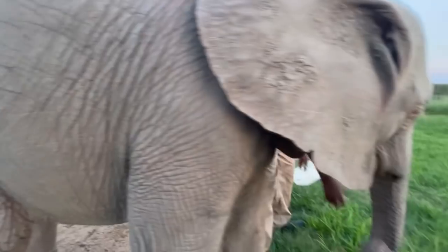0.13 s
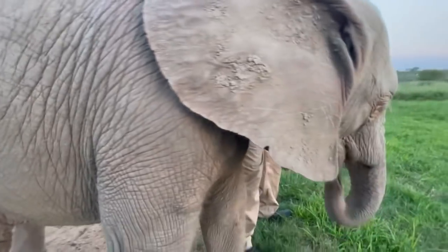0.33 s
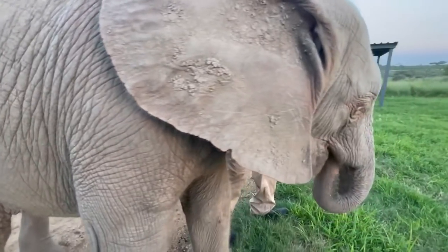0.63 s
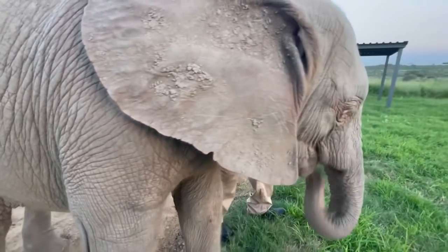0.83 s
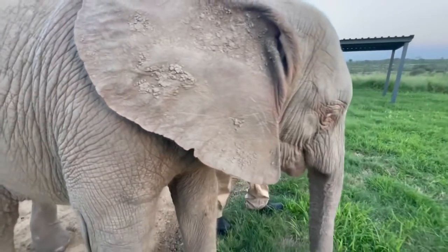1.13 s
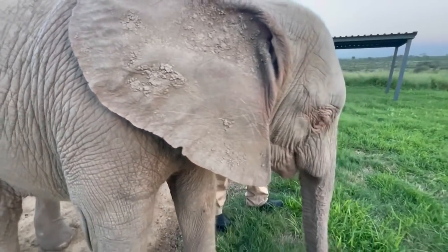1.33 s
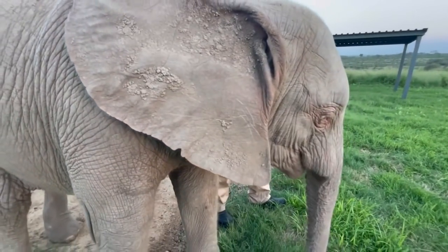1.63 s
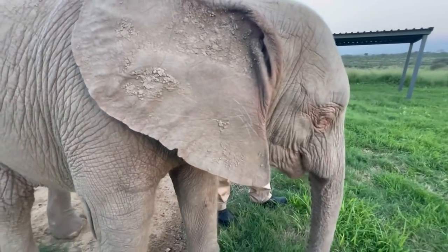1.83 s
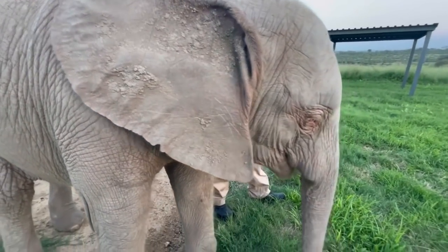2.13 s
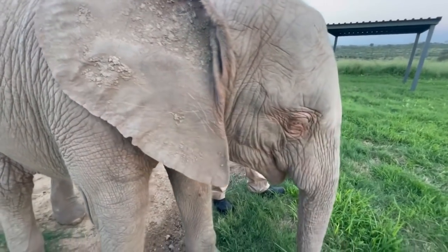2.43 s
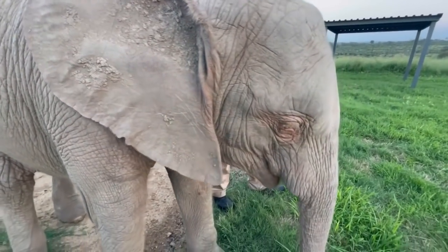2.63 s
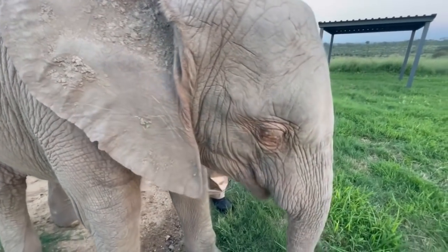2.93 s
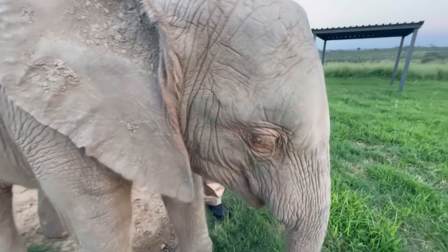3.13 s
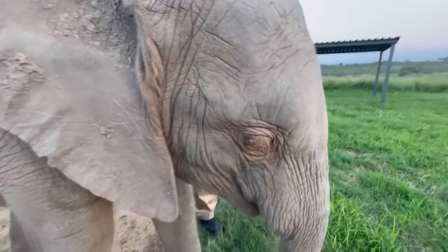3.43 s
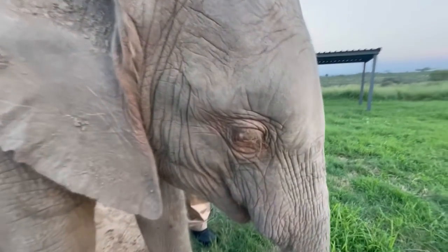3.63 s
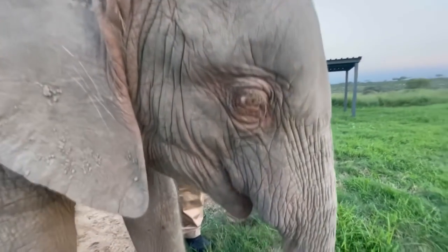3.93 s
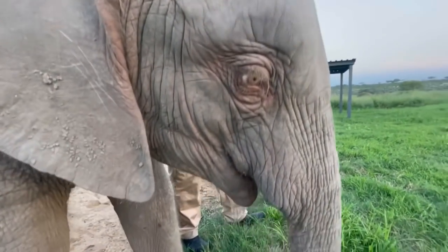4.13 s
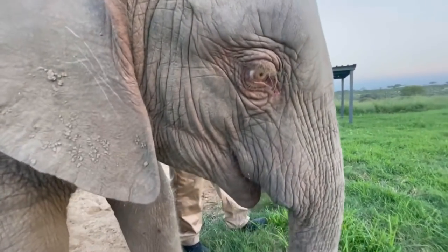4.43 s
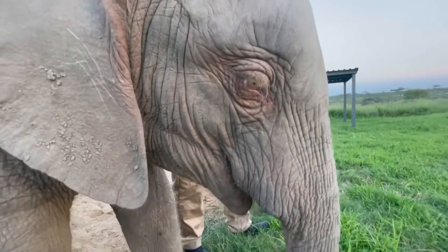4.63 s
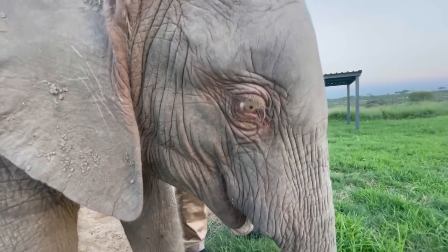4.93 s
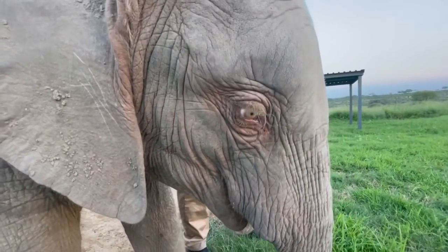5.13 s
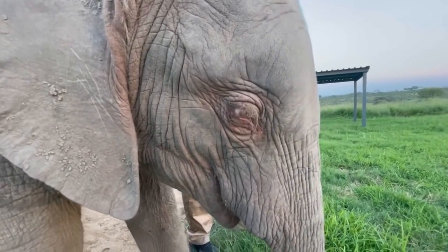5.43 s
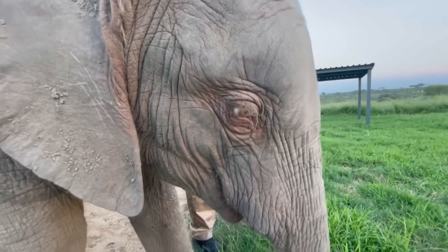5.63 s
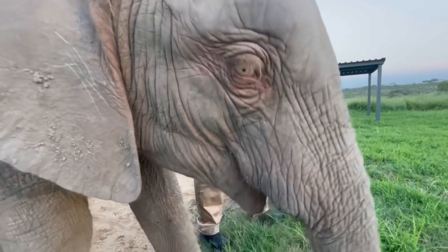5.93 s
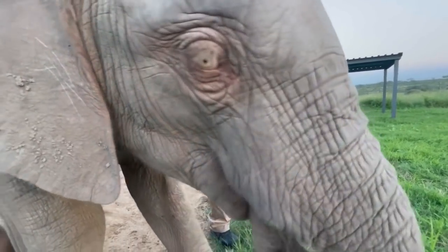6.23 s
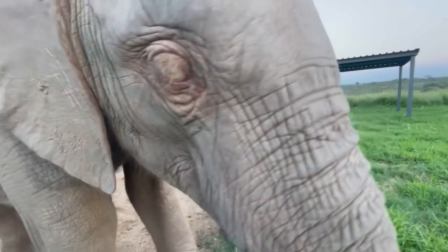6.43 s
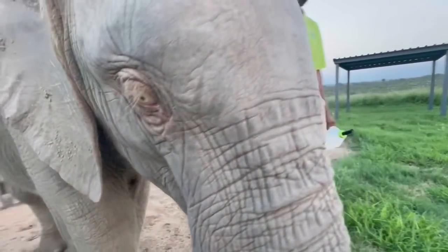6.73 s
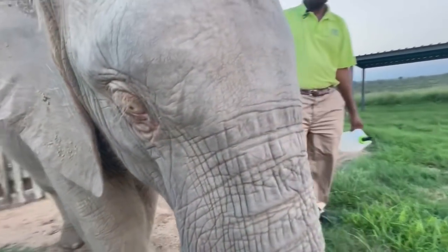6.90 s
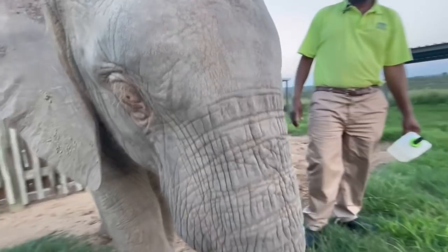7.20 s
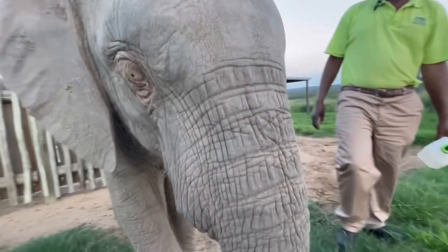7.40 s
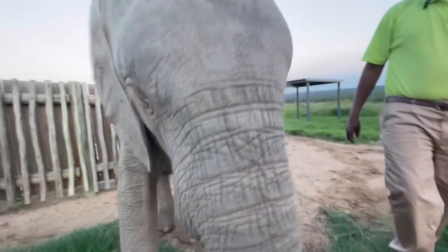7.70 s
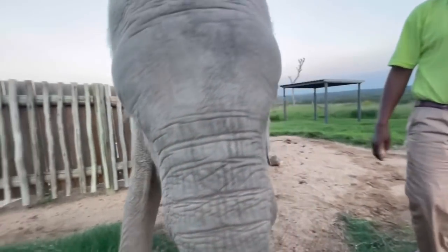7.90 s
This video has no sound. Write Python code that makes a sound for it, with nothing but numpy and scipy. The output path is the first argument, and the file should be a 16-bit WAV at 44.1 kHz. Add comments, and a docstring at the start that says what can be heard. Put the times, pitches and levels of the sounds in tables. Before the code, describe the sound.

A steady, high-pitched drone of crickets and other insects fills an open field throughout, with very faint wind underneath. Close by, a young elephant shifts its weight, making soft scuffs, grass rustle and a couple of light knocks in the first second. A small bird trills faintly at about 1.3 and 2 seconds, and thin pips and dry ticks are scattered until a soft knock near 3.6 seconds. At about 4.7 seconds the grass rustles harder as the animal tugs at it. Stalks snap, sparsely at first and then rapidly, until the tuft rips loose with a crisp crackle and low thumps around 5.6 seconds, by far the loudest moment. From 6.5 seconds there is more shuffling with several soft, hollow knocks. Short chirps return from about 7 seconds, and the insects swell slightly up to the end at 8 seconds.

```python
"""Dusk in a grassy paddock. From the start, crickets and katydids drone on resonant wings over faint wind,
while a large calf close by shifts its feet and ears, with friction noise, soft knocks and dry ticks.
After a second a bird trills twice, and small birds or frogs pip. Near five seconds the calf tugs at
the grass: stalks snap, ever faster, until the tuft tears loose with low thumps at about 5.6 s.
More shuffling, knocks and pips follow, and the insects swell toward the end."""
import sys
import numpy as np
from scipy import signal
from scipy.fft import rfft, irfft, next_fast_len
from scipy.io import wavfile
from scipy.ndimage import map_coordinates

SR = 44100
rng = np.random.default_rng(int(sys.argv[2]) if len(sys.argv) > 2 else 0)


def wav_out(sig):
    """Save sig, one row per channel (or a flat mono array), as 16-bit PCM at SR to the path in sys.argv[1]."""
    wavfile.write(sys.argv[1], SR, np.round(np.clip(np.atleast_2d(sig).T, -1, 1) * 32767).astype(np.int16))


N = 355446
T = np.arange(N) / SR
AGE = T[:SR // 2]   # seconds since the onset of a short event

# Likeness of the two channels, at large and for close snaps. Each row: frequency in Hz, correlation.
LIKENESS = [(60, 0.77), (110, 0.59), (200, 0.62), (380, 0.23), (700, 0.026), (1290, -0.14), (2380, -0.15),
            (4400, -0.03), (8120, -0.59), (15000, -0.16)]
NEAR_LIKENESS = [(60, 0.91), (130, 0.96), (290, 0.87), (640, 0.29), (1410, -0.075), (3100, 0.65),
                 (6820, -0.048), (15000, -0.13)]
# Lean of coloured noise. Each row: frequency in Hz, pan in dB (pan is always left minus right).
BALANCE = [(60, 2), (130, 0.5), (290, 1), (640, 1.5), (1410, 1), (3100, 2.0), (6820, 3), (15000, -5.5)]
# Spectra of the wind and of the crickets' wings. Each row: frequency in Hz, relative level in dB.
WIND_SPECTRUM = [(20, -40), (35, -13), (60, 4), (90, -3), (140, -7), (300, -40)]
CHORUS_SPECTRUM = [(4300, -56), (4650, -41), (5000, -8), (5280, 1.5), (5420, -4.5), (5570, 1), (5720, -5),
                   (5900, -7), (6020, -23), (6400, -44)]
# Wind on the microphone. Each row: time in seconds, level in dB.
GUSTS = [(0.0, -65), (1.0, -64.5), (1.7, -68), (3.6, -65), (3.95, -62.5), (5.4, -64.5), (5.6, -57),
         (5.8, -66), (6.25, -61), (6.45, -74), (6.7, -59), (7.0, -67), (8.06, -60.5)]

# The far insects. Each row: time in seconds, cricket chorus level in dB, upper chorus level in dB.
INSECT_LEVELS = [(0.0, -55, -68), (0.4, -56.5, -66), (0.8, -54.5, -69), (2.3, -52.5, -63.5),
                 (3.4, -55.5, -65), (4.2, -56, -64), (5.1, -55.5, -61.5), (5.7, -54, -57.5),
                 (6.0, -54, -65.5), (6.85, -56.5, -60.5), (7.3, -53.5, -60), (8.06, -54.5, -64)]
# The nearer crickets. Each entry: wing pitch in Hz.
NEAR_WINGS_HZ = [5050, 5130, 5290, 5280, 5380, 5470, 5550, 5640, 5720, 5930]
# Swells of katydids and of low crickets. Each row: middle in seconds, length in seconds, rise in dB.
KATYDID_SWELLS = [(0.5, 0.96, 4.5), (3.2, 4.1, 3.5), (4.29, 0.61, 8.6), (5.07, 0.4, 8.6), (6.4, 0.79, 3),
                  (7.4, 0.68, 6.7), (8.001, 1.2, 8.3)]
LOW_CRICKET_SWELLS = [(0.0, 0.88, 7), (2.13, 0.52, 6), (3.55, 0.5, 6), (5.5, 1.1, 8), (7.25, 1.5, 10.5)]
MEAN_STROKES_PER_S = 45
UPPER_HZ, UPPER_WIDTH_HZ = 8565, 1130
KATYDID_HZ, KATYDID_WIDTH_HZ, KATYDID_PER_S, KATYDID_DB = 15000, 2200, 65, -68
LOW_CRICKET_HZ, LOW_CRICKET_WIDTH_HZ, LOW_CRICKET_PER_S, LOW_CRICKET_DB = 4943, 190, 41.7, -69.5

# The falling notes of a bird's two trills. Each row: start in seconds, level in dB.
TRILL = [(1.261, -61), (1.312, -59), (1.337, -56), (1.374, -56), (1.407, -59), (1.453, -58), (1.488, -55),
         (1.533, -58), (2.0, -58), (2.026, -61), (2.05, -59), (2.077, -60), (2.109, -60), (2.149, -58),
         (2.185, -57), (2.229, -58), (2.265, -58)]
TRILL_NOTE_S, TRILL_FROM_HZ, TRILL_TO_HZ = 0.0162, 5200, 4430
# Single pips. Each row: start and length in seconds, first and last pitch in Hz, level and pan in dB.
PIPS = [(1.285, 0.02, 4300, 3900, -63, 0), (1.6, 0.026, 2900, 2900, -65, 2),
        (2.22, 0.017, 1970, 1970, -64, 0), (2.717, .025, 3190, 3100, -67, 5),
        (1.978, 0.045, 1510, 1490, -65, 8.5), (2.14, 0.039, 1510, 1520, -67, 11),
        (2.28, 0.04, 1490, 1520, -61, 7), (2.438, 0.028, 1525, 1490, -63.5, 8),
        (2.433, 0.033, 3080, 3070, -65, 10), (2.462, 0.026, 2890, 2730, -61, 9),
        (2.865, 0.035, 3010, 3050, -66, 0), (3.28, 0.033, 4250, 3830, -64, 2),
        (3.35, 0.072, 2570, 2475, -58, 7), (3.452, 0.029, 4300, 3830, -61.5, -12),
        (6.87, 0.024, 4470, 3940, -56.5, 0), (6.89, 0.011, 4500, 3900, -57, 0),
        (7.017, 0.0146, 2600, 3000, -58, 0), (7.034, 0.033, 4550, 3800, -57, 2),
        (7.102, 0.021, 3780, 3730, -59, 0), (7.155, .03, 3700, 3600, -59, 0),
        (7.641, 0.065, 3600, 3584, -61.5, 20), (8.014, 0.09, 3600, 3570, -57.5, 14),
        (7.995, 0.058, 3240, 3260, -61, 2)]
# Reflections off ground and shelter. Each row: delay in seconds, gain in dB.
ECHOES = [(.009, -13), (.021, -16), (0.039, -23)]

# Spectra of hide and feet, hollow scuffing, grass and dry leaf tips.
# Each row: frequency in Hz, relative level in dB.
HIDE_SPECTRUM = [(70, -1), (120, 5), (200, 3), (350, -4), (600, -27)]
SCUFF_SPECTRUM = [(300, -2), (480, -1.5), (750, 1.5), (1100, 1.5), (1500, -2.5), (2200, -33)]
GRASS_SPECTRUM = [(1200, -6.5), (1900, 4.5), (2500, 3.5), (4000, 2), (6500, 1.5), (7500, -11.5),
                  (9000, -17.5)]
TIPS_SPECTRUM = [(5500, 5), (6600, 11.5), (7500, 2.5), (8800, 13), (10500, 2.5), (13000, 3.5), (16000, -30)]
# The calf shifts its weight. Each row: middle and length in seconds, rise of hide and of scuff in dB.
SHIFTS = [(0.3, 1.0, 9.9, 13.8), (0.72, 0.63, 14, 13.4), (1.05, 0.54, 7.2, 9.3), (1.9, 0.75, 7.1, 7.5),
          (2.4, 0.44, 8.6, 2.7), (2.95, 0.49, 1.8, 4), (3.75, 1, 1.9, 8.5), (4.3, 0.72, 6.1, 4.7),
          (4.72, 0.79, 16, 14.8), (5.25, 0.51, 13.5, 1.5), (5.62, 0.31, 16, 4.3), (6.1, 1, 9.1, 6.7),
          (6.68, 0.79, 18, 12.4), (7.2, 1, 9.6, 12.5), (7.65, 0.66, 11, 9), (8.06, 0.61, 7.4, 7.5)]
HIDE_DB, SCUFF_DB = -76, -72
# Rustling grass. Each row: time in seconds, grass level in dB, leaf tip level in dB.
RUSTLE_LEVELS = [(0.0, -65, -62), (0.3, -59, -55), (0.5, -58, -60.5), (0.7, -60, -57), (0.95, -66, -80),
                 (1.42, -64, -67.5), (1.7, -62, -66.5), (2.3, -62.5, -64), (2.7, -64, -66.5),
                 (3.4, -62, -65), (4.1, -61.5, -56.5), (4.45, -57, -58.5), (4.68, -58, -68),
                 (4.8, -50.5, -58), (4.95, -55.5, -57), (5.08, -61, -49.5), (5.2, -68, -57),
                 (5.33, -64, -51.5), (5.46, -61.5, -63), (5.62, -56.5, -57), (5.8, -59, -60.5),
                 (5.93, -61, -58), (6.2, -60.5, -63), (6.5, -57.5, -59.5), (6.65, -55, -65),
                 (7.15, -58.5, -62.5), (7.7, -67, -55), (8.06, -67, -56.5)]
PATCH_S, PATCH_OCTAVES, PATCH_DB = .05, .15, 3.0
# Brushing strokes. Each row: start and length in seconds, centre and width in Hz, level and pan in dB.
BRUSHES = [(.001, .45, 135, 50, -64, 0), (.002, .19, 720, 150, -67, -2), (.047, .12, 1190, 100, -67, 5),
           (.09, .2, 1940, 250, -65, -3), (.251, .19, 750, 120, -59, 10), (.482, .09, 1050, 250, -63, -1),
           (.593, .15, 1120, 500, -58, -4), (.678, .12, 950, 700, -63, 0), (2.721, .27, 130, 60, -69, 0),
           (4.126, .14, 12000, 8000, -63, -6), (4.201, .3, 260, 120, -68, 0),
           (4.695, .085, 4400, 6000, -50, 8), (4.701, .07, 13000, 5000, -62, 0),
           (4.703, .07, 2600, 1100, -53, 4), (4.706, .06, 6300, 1500, -54, 5),
           (4.814, .056, 6000, 7000, -55, 4), (5.029, .085, 280, 25, -64, 2),
           (5.035, .13, 4500, 6000, -58, 1), (5.156, .07, 297, 25, -65, -1),
           (5.253, .022, 6500, 7000, -52, -1), (5.376, .014, 8500, 10000, -49, -3),
           (5.636, .2, 6450, 900, -59, 15), (6.493, .12, 770, 500, -58, 5), (6.523, .24, 470, 250, -61, 10),
           (6.541, .19, 725, 70, -62, 4), (6.552, .18, 910, 90, -65, 3), (6.642, .27, 240, 130, -55, 3),
           (6.686, .07, 1650, 120, -65, 3), (6.716, .063, 795, 120, -61, 5),
           (7.184, .05, 7000, 9000, -53, -5), (7.188, .044, 980, 400, -62, -4),
           (7.192, .037, 3240, 300, -56, 4), (7.198, .013, 5000, 7000, -49, 12),
           (7.627, .064, 460, 150, -60, 5)]
# Soft knocks. Each row: start in seconds, peak in dB, body pitch in Hz, t60 in seconds, pan in dB.
KNOCKS = [(0.302, -49, 730, 0.071, 10), (0.614, -44.5, 680, 0.1, 1), (2.42, -55, 450, 0.057, 7),
          (3.615, -43, 820, 0.037, 4), (6.524, -42.5, 890, 0.058, 4), (6.697, -47, 950, 0.061, 17),
          (6.926, -41, 890, 0.096, 4), (7.021, -46, 490, 0.057, 0), (7.199, -47, 990, 0.022, 6),
          (7.631, -46.5, 980, 0.41, -4), (7.765, -49, 1030, 0.067, -2)]
# Dry ticks. Each row: start in seconds, peak in dB, centre in Hz, pan in dB.
TICKS = [(1.13, -60, 900, 2), (1.333, -50, 1890, 4), (1.518, -52, 1460, 5), (1.69, -46.5, 2140, 3),
         (2.05, -51, 1720, 7), (2.118, -55, 300, 14), (2.389, -59, 301, 3), (2.423, -56, 1530, 12),
         (3.372, -57, 780, 11), (3.225, -48, 1910, 6), (3.243, -45.5, 1860, 2.5), (3.483, -54.5, 713, -5),
         (3.715, -49, 1590, 6), (3.225, -46, 11000, 0), (4.16, -39, 14800, 0), (5.098, -48, 13500, 0),
         (5.878, -44, 13500, 0), (5.9, -52, 10000, 0), (5.921, -43, 13000, 0), (5.0375, -39, 12000, -3),
         (5.347, -30, 13000, -3), (6.357, -50, 950, 3.5), (6.856, -48, 1890, 1.5), (7.058, -45, 1900, 0)]

# Thumps as the tuft tears loose. Each row: start in seconds, level in dB, pitch in Hz, t60 in seconds.
THUMPS = [(5.5, -39.5, 200, 0.046), (5.521, -40, 191, 0.08), (5.534, -34.5, 191, 0.045),
          (5.549, -40, 170, 0.08), (5.565, -25, 208, 0.036), (5.585, -20.5, 156, 0.021),
          (5.595, -39, 92, 0.073)]
# Snapping stalks. Each row: start, rise time and t60 in seconds,
# levels of stalk, skin, low ring and high ring in dB, pan in dB.
SNAPS = [(4.929, .00055, 0.04, -48.5, -42, -51, -55, 2), (5.0364, .0003, .02, -48, -38, -67, -63, -3.5),
         (5.3034, .0004, 0.035, -35.5, -36, -61, -61, 0), (5.336, .0008, .034, -49, -38, -65, -65, -5),
         (5.3467, .00011, 0.02, -42, -29.5, -62, -60, -2), (5.4155, .0003, .02, -48, -32, -74, -68, 2),
         (5.488, .0005, 0.028, -38, -37, -63, -61, 0), (5.4941, 0.00023, 0.026, -28.5, -26, -37, -43, 0.5),
         (5.5027, .0006, 0.022, -35, -26, -55, -44, 1), (5.5145, .0003, 0.025, -31, -21, -46, -47, 1),
         (5.5247, .0004, 0.035, -29.5, -26.5, -40, -45, -4), (5.529, .0008, .014, -26, -28, -48, -43, 3),
         (5.5335, .0006, 0.029, -30.5, -23, -45, -49, 3), (5.5365, 0.00064, 0.019, -23, -19, -40, -44, 3),
         (5.543, .001, 0.048, -38, -31, -47, -40, 5), (5.5535, 0.0018, .04, -30.5, -26, -41, -41, -6),
         (5.5573, 0.0013, 0.023, -12, -16, -27, -20.5, 1),
         (5.5665, 0.00052, .025, -29, -25, -38.5, -47, -5), (5.572, .002, 0.043, -32, -28, -47, -45, -4),
         (5.5778, 0.0016, 0.018, -17, -11.5, -30, -33, -3), (5.5845, .0005, 0.036, -36, -35, -42, -45, 2),
         (5.6332, .0002, .025, -44, -39.5, -60, -64, -1)]
# Spectra of tearing fibres and of crackling skin. Each row: frequency in Hz, relative level in dB.
STALK_SPECTRUM = [(300, -30), (900, -8.5), (1690, -22), (2260, -7), (2700, -19), (3190, -7.5), (4250, 1),
                  (5600, -5), (6080, 3), (8000, -9), (10400, -18), (17600, -120)]
SKIN_SPECTRUM = [(5500, -23), (7500, -37), (8600, 10), (10500, -4), (14500, 2), (16500, 2.5)]
# Modes of the breaking tuft. Each row: frequency in Hz, relative level in dB, t60 in seconds.
LOW_MODES = [(413, -10, .03), (646, -6.5, 0.022), (890, -7, 0.037), (1265, -1.5, 0.026)]
HIGH_MODES = [(1920, -9.5, 0.027), (2200, -3.5, 0.025), (2385, -7, 0.034)]
MODE_SPREAD_DB, SKIN_DECAY_SHARE = 2, 0.9
WIDE_BELOW_HZ, CUTOFF_HZ = 11800, 16100


def amp(db):
    """Amplitude ratio of a level in decibels."""
    return 10 ** (np.asarray(db) / 20)


def rms_one(x):
    """Normalisation to unit mean power."""
    return x / np.sqrt(np.mean(x ** 2) + 1e-20)


def pan(db):
    """Direction by level difference: left and right gains db apart."""
    return amp([[db / 2], [-db / 2]])


def add(out, start, sound):
    """Superposition of a sound from its start in seconds."""
    i = round(start * SR)
    out[:, i:i + sound.shape[-1]] += sound[..., :N - i]


def in_time(rows):
    """Linear interpolation of each level column, one value a sample."""
    times, *columns = np.transpose(rows)
    return [np.interp(T, times, column) for column in columns]


def at_hz(points, hz):
    """Interpolation on a logarithmic frequency axis."""
    frequencies, values = np.transpose(points)
    return np.interp(np.log(hz + 1), np.log(frequencies), values)


def swelling(base_db, rows):
    """Levels in dB, one per rise column: a base lifted by raised-cosine humps."""
    lift = 0
    for middle, length, *rises in rows:
        hump = np.cos(np.pi * np.clip((T - middle) / length, -.5, .5)) ** 2
        lift = lift + np.outer(rises, hump)
    return np.reshape(base_db, (-1, 1)) + lift


def burst(t60, rise_s):
    """A fast rise and an exponential decay of 60 dB in t60 seconds."""
    return (1 - np.exp(-AGE / rise_s)) * amp(-60 * AGE / max(t60, .003))


def drift(corner_hz):
    """Random fluctuation: low-passed noise of unit spread."""
    step = 40   # samples between knots
    knots = rng.standard_normal(N // step + 2002)
    r = np.exp(-2 * np.pi * corner_hz * step / SR)
    slow = signal.lfilter([1], [1, -2 * r, r * r], knots)[2000:]
    return np.interp(np.arange(N) / step, np.arange(len(slow)), rms_one(slow))


def resonance(x, hz, width_hz):
    """A damped two-pole resonator with unit gain at its peak."""
    r = np.exp(-np.pi * width_hz / SR)
    gain = (1 - r * r) / 2
    return signal.lfilter([gain, 0, -gain], [1, -2 * r * np.cos(2 * np.pi * hz / SR), r * r], x)


def double_resonance(x, hz, width_hz):
    """Two equal resonators in cascade give a band with steeper skirts."""
    return resonance(resonance(x, hz, width_hz), hz, width_hz)


def coloured(x, spectrum, likeness=LIKENESS):
    """Mid-side mixing gives two independent noises a spectrum and a correlation, at unit power."""
    size = next_fast_len(N)
    hz = np.arange(size // 2 + 1) * SR / size
    mid, side = rfft(x, size) * amp(at_hz(spectrum, hz))
    alike = np.clip(at_hz(likeness, hz), -.99, .99)
    mid, side = np.sqrt(1 + alike) * mid, np.sqrt(1 - alike) * side
    lean = amp(at_hz(BALANCE, hz) / 2)
    left_right = np.array([(mid + side) * lean, (mid - side) / lean])
    return rms_one(irfft(left_right, size)[:, :N])


def near_noise():
    """Half a second of noise, partly coherent between the sides."""
    shared, left, right = rng.standard_normal((3, SR // 2))
    return shared + .6 * np.array([left, right])


def uneven_noise(spectrum, level_db, grain_db, patchy_db):
    """Random amplitude modulation: noise jumps in fast grains and wanders in slow patches."""
    grains = amp(grain_db * drift(101) + patchy_db * drift(11.6))
    return amp(level_db) * coloured(grains * rng.standard_normal((2, N)), spectrum)


def wind():
    """Gusts on the microphone are low-frequency pressure fluctuations."""
    return uneven_noise(WIND_SPECTRUM, in_time(GUSTS)[0], grain_db=3.0, patchy_db=1.1)


def cricket_chorus():
    """Many far wings sum incoherently to a noise band; a few nearer tones pulse out of it."""
    crowd = coloured(rng.standard_normal((2, N)) * amp(drift(13)), CHORUS_SPECTRUM)
    near = 0
    for hz, (pace, offset, lag) in zip(NEAR_WINGS_HZ, rng.standard_normal((len(NEAR_WINGS_HZ), 3))):
        strokes_per_s = MEAN_STROKES_PER_S * (1 + .3 * pace)
        strokes = np.cos(np.pi * strokes_per_s * T + offset + 1.5 * drift(15)) ** 2
        phase = 2 * np.pi * hz * T + 2.1 * drift(7.5)
        gain = amp(at_hz(CHORUS_SPECTRUM, hz) + 3.1 * drift(3.9))
        near = near + strokes * gain * np.sin(phase + [[0], [np.pi + 2.2 * lag]])
    return rms_one(crowd + 0.61 * rms_one(near) * pan(7.5))


def upper_chorus():
    """Smaller insects blur into noise shaped by a higher wing resonance, louder on the right."""
    shared, left, right = rng.standard_normal((3, N))
    drive = np.array([left + 0.53 * shared, right - 0.56 * shared]) * pan(-3.0)
    return rms_one(double_resonance(drive, UPPER_HZ, UPPER_WIDTH_HZ)) * amp(2.1 * drift(5.8))


def katydids():
    """Periodic tooth strikes drive a resonance, rasping over the hiss of the neighbours."""
    strikes = (.5 + .5 * np.cos(2 * np.pi * KATYDID_PER_S * T)) ** 8
    drive = (1 + .7 * strikes * amp(3 * drift(1))) * rng.standard_normal(N)
    rasp = rms_one(double_resonance(drive, KATYDID_HZ, KATYDID_WIDTH_HZ))
    return amp(swelling(KATYDID_DB, KATYDID_SWELLS)) * rasp


def low_crickets():
    """Wing strokes modulate the noise that drives a narrow resonance, so that it throbs."""
    strokes = 0.3 + np.cos(np.pi * LOW_CRICKET_PER_S * (T - 0.0084)) ** 4
    drive = rng.standard_normal((2, N)) * strokes * amp(1.6 * drift(40))
    throb = rms_one(double_resonance(drive, LOW_CRICKET_HZ, LOW_CRICKET_WIDTH_HZ))
    return amp(swelling(LOW_CRICKET_DB, LOW_CRICKET_SWELLS)) * throb


def chirp(length, from_hz, to_hz):
    """A linear frequency glide under a half-sine envelope."""
    progress = np.linspace(0, 1, round(length * SR))
    hz = from_hz + (to_hz - from_hz) * progress
    return np.sin(np.pi * progress) * np.sin(2 * np.pi * np.cumsum(hz) / SR)


def birds():
    """Multipath propagation: trills and pips arrive roughened by the air, then as reflections."""
    calls = np.zeros((2, N))
    for start, db in TRILL:
        add(calls, start, amp(db) * chirp(TRILL_NOTE_S, TRILL_FROM_HZ, TRILL_TO_HZ) * pan(1.0))
    for start, length, from_hz, to_hz, db, pan_db in PIPS:
        add(calls, start, amp(db) * chirp(length, from_hz, to_hz) * pan(pan_db))
    heard = calls * amp(2 * np.array([drift(150), drift(150)]) - 1)
    for delay, db in ECHOES:
        add(heard, delay, amp(db) * calls[::-1] * amp(4.9 * drift(120)))   # sides swapped
    return heard


def calf_rustle():
    """Dense, uneven contacts of hide, feet, grass and leaf tips merge into friction noise."""
    hide_db, scuff_db = swelling([HIDE_DB, SCUFF_DB], SHIFTS)
    grass_db, tips_db = in_time(RUSTLE_LEVELS)
    return (uneven_noise(HIDE_SPECTRUM, hide_db, grain_db=4.0, patchy_db=1.5)
            + uneven_noise(SCUFF_SPECTRUM, scuff_db, grain_db=1.5, patchy_db=1.05)
            + uneven_noise(GRASS_SPECTRUM, grass_db, grain_db=0.5, patchy_db=1.5)
            + uneven_noise(TIPS_SPECTRUM, tips_db, grain_db=1.0, patchy_db=2.5))


def patchy(x):
    """Spectral modulation: narrow bands swell and sink as one blade or fold after another sounds."""
    hz, times, tiles = signal.stft(x, SR, nperseg=1024)
    chance = rng.standard_normal((200, 400))
    place = np.meshgrid(np.log2(1 + hz / 100) / PATCH_OCTAVES, times / PATCH_S, indexing="ij")
    gain = amp(PATCH_DB * map_coordinates(chance, place, order=1, mode="mirror"))
    return signal.istft(tiles * rms_one(gain), SR, nperseg=1024)[1][:, :N]


def brushes():
    """Gritty friction starts quickly and fades; resonance gives each stroke its hollow colour."""
    out = np.zeros((2, N))
    for start, length, hz, width_hz, db, pan_db in BRUSHES:
        progress = np.clip(AGE / length, 0, 1)
        envelope = np.sin(np.pi * progress ** 0.59) ** 0.41
        rubbed = rms_one(resonance(resonance(near_noise(), hz, width_hz), hz, 1.1 * width_hz))
        add(out, start, amp(db) * envelope * rubbed * pan(pan_db))
    return out * amp(1.3 * drift(300))


def knocks():
    """A puff of noise excites a hollow body at its natural frequency; some of it stays broadband."""
    out = np.zeros((2, N))
    for start, db, hz, t60, pan_db in KNOCKS:
        puff = burst(t60, rise_s=0.003) * near_noise()
        knock = resonance(puff, hz, 0.2 * hz) + 0.6 * double_resonance(puff, 0.9 * hz, 1.2 * hz)
        add(out, start, amp(db) * knock / np.abs(knock).max() * pan(pan_db))
    return out


def ticks():
    """One sharp contact excites a heavily damped resonance, which dies within a few cycles."""
    out = np.zeros((2, N))
    for start, db, hz, pan_db in TICKS:
        tick = double_resonance(burst(t60=.003, rise_s=.0001), hz, .6 * hz)
        add(out, start, amp(db) * tick / np.abs(tick).max() * pan(pan_db))
    return out


def thumps():
    """Low damped oscillations of the ground and the microphone body."""
    out = np.zeros((2, N))
    for start, db, hz, t60 in THUMPS:
        add(out, start, amp(db) * burst(t60, rise_s=0.0035) * np.sin(2 * np.pi * hz * AGE))
    return out


def tuft_ring(modes):
    """Free vibration: each mode decays from a random strength, with a random phase between the sides."""
    ring = 0
    for (hz, db, t60), (strength, lag) in zip(modes, rng.standard_normal((len(modes), 2))):
        tone = np.sin(2 * np.pi * hz * AGE + [[0], [1.6 * lag]])
        ring = ring + amp(db + MODE_SPREAD_DB * strength) * burst(t60, rise_s=0.00046) * tone
    return ring


def stalk_snaps():
    """Fracture: fibres tear in a noise burst, the dry skin crackles on top, and the tuft rings."""
    fibre_envelope, skin_envelope, rings = np.zeros((3, 2, N))
    for start, rise_s, t60, stalk_db, skin_db, low_db, high_db, pan_db in SNAPS:
        sides = pan(pan_db)
        add(fibre_envelope, start, amp(stalk_db) * burst(t60, rise_s) * sides)
        add(skin_envelope, start, amp(skin_db) * burst(SKIN_DECAY_SHARE * t60, rise_s) * sides)
        ring = amp(low_db) * tuft_ring(LOW_MODES) + amp(high_db) * tuft_ring(HIGH_MODES)
        add(rings, start, ring * sides)
    fibres = coloured(rng.standard_normal((2, N)), STALK_SPECTRUM, NEAR_LIKENESS)
    skin = coloured(rng.standard_normal((2, N)), SKIN_SPECTRUM, NEAR_LIKENESS)
    return fibre_envelope * fibres + skin_envelope * skin + rings


def scene():
    """Superposition of all sources, left and right."""
    chorus_db, upper_db = in_time(INSECT_LEVELS)
    choruses = amp(chorus_db) * cricket_chorus() + amp(upper_db) * upper_chorus()
    insects = choruses + katydids() + low_crickets()
    rustle = calf_rustle()
    background = insects + wind() + birds()
    return background + patchy(rustle) + brushes() + stalk_snaps() + knocks() + ticks() + thumps()


def record(dry):
    """Side cancellation narrows the highest treble; band limiting cuts the deepest bass and the top."""
    side = (dry[0] - dry[1]) / 2
    treble_side = signal.sosfiltfilt(signal.butter(8, WIDE_BELOW_HZ, "high", fs=SR, output="sos"), side)
    narrowed = np.array([dry[0] - .8 * treble_side, dry[1] + .8 * treble_side])
    bass_cut = signal.sosfilt(signal.butter(3, 36, "high", fs=SR, output="sos"), narrowed)
    return signal.sosfilt(signal.cheby2(24, 60, CUTOFF_HZ, fs=SR, output="sos"), bass_cut)


dry = scene()
out = record(dry)
wav_out(out)
```